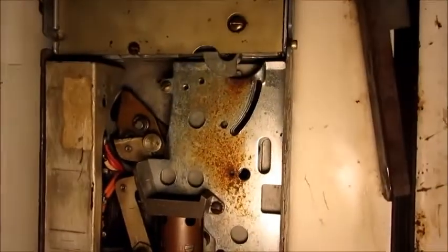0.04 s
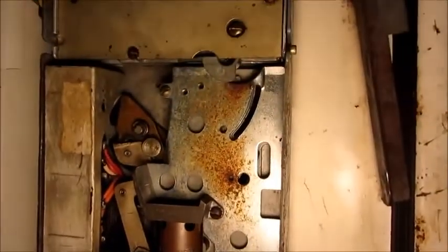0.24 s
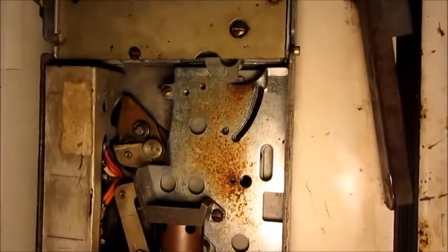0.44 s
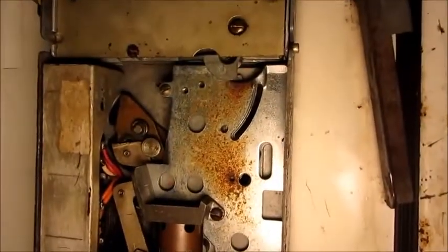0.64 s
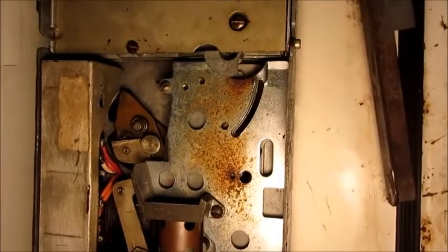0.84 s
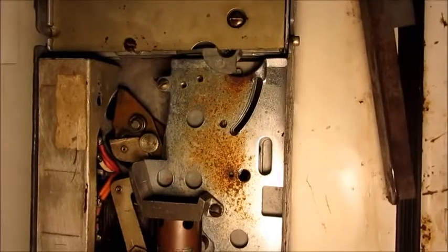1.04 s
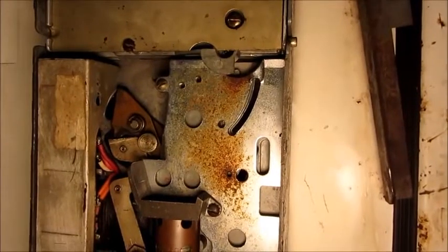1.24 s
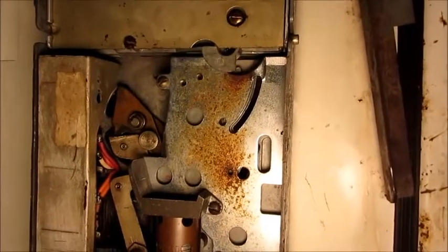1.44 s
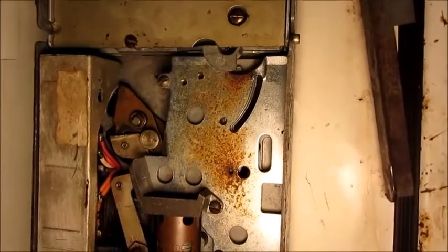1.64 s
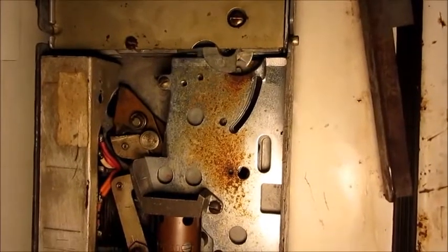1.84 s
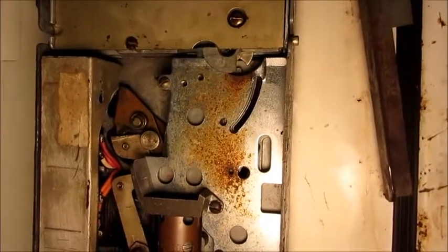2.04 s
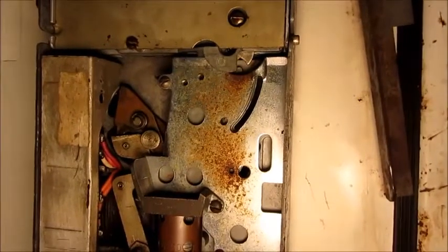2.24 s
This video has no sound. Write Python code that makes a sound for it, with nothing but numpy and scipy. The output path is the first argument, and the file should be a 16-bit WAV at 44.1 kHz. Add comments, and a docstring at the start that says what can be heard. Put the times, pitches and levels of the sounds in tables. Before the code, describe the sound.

A coin drops through a mechanical coin changer, clacking quickly against steel guides and levers, with brief scrapes and a thin, high ring between hits. It is heard up close in a small room with a low hum.

```python
"""A small room hums over low noise and a faint hiss. At 0.9 s, close by, a coin skids into a mechanical
coin changer and falls through it, clacking against steel guides and levers. Every contact rings the
struck part and the frame and knocks the housing. Between contacts the rim scrapes along guides, and in
free flight the coin itself sings very high. The last clack comes just after 2 s; the hum remains."""
import sys
import numpy as np
from scipy import signal
from scipy.fft import rfft, irfft, next_fast_len
from scipy.io import wavfile
from scipy.ndimage import map_coordinates

SR = 44100
rng = np.random.default_rng(int(sys.argv[2]) if len(sys.argv) > 2 else 0)


def wrap_up_sound(samples):
    """Save the sound to the file named by the first command line argument, as 16-bit audio."""
    columns = np.atleast_2d(samples).T
    # keep every value between -1 and 1, then stretch to whole-number steps
    tamed = np.clip(columns, -1, 1)
    steps = np.round(tamed * 32767).astype(np.int16)
    wavfile.write(sys.argv[1], SR, steps)


N = 100239

# Room noise spectrum. Each row: frequency in Hz, relative level in dB.
AIR_SPECTRUM = [(15, -36.5), (26, -7.5), (34, -9.5), (44, -15), (60, -8.5), (95, -6), (115, -3.5),
                (140, -4), (200, -1.5), (300, -9), (420, -12.5), (640, -16), (850, -18.5), (1600, -28.5),
                (3400, -40), (6500, -47), (8100, -46.5), (14400, -63), (16000, -84.5)]
# Room noise envelope. Each row: time in seconds, level in dB before AIR_GAIN_DB.
AIR_ENVELOPE = [(0, -42), (.5, -39.5), (.72, -37.5), (1.0, -39), (1.48, -39.5), (1.6, -43), (2.1, -45),
                (2.27, -45)]
# Hiss spectrum. Each row: frequency in Hz, relative level in dB.
HISS_SPECTRUM = [(300, 2.5), (800, 3.5), (2000, 4.5), (4000, -6), (6500, -23.5), (8000, -7.5), (9000, -25),
                 (14000, -32.5)]
# Hum envelope. Each row: time in seconds, level in dB.
HUM_ENVELOPE = [(0, -40), (.25, -44), (.42, -46), (.66, -34), (.82, -54), (.95, -38), (1.15, -43),
                (1.6, -52), (2.0, -49.5), (2.27, -41.5)]
# Room decay. Each row: frequency in Hz, T60 in seconds.
ROOM_DECAY = [(300, 0.15), (3000, 0.62), (8000, .28), (15000, 0.33)]
# Coin sliding on a guide. Each row: start in seconds, length in seconds, level in dB,
# guide resonance in Hz.
GUIDE_SLIDES = [(0.913, 0.055, -48.5, 5550), (0.983, 0.015, -31, 2900), (1.002, .03, -27, 5500),
                (1.162, 0.089, -45.5, 2600), (1.358, 0.27, -52.5, 2600), (1.555, 0.036, -36.5, 4100),
                (1.591, 0.049, -45, 4050), (1.678, 0.016, -45.5, 3620), (1.77, 0.045, -42, 2520)]
# Scrape spectrum. Each row: frequency in Hz, relative level in dB.
SCRAPE_SPECTRUM = [(500, -2.5), (1500, -3.5), (2600, 8), (4200, 2.5), (7500, -3.5), (10000, -15),
                   (15000, -23.5)]
# Coin ringing in flight. Each row: start in seconds, length in seconds, lower and upper mode level in dB.
FLIGHTS = [(.975, .04, -37, -40), (1.012, 0.05, -41, -38), (1.314, 0.025, -60, -50),
           (1.375, 0.031, -47, -55), (1.522, 0.055, -48, -37.5), (1.551, .04, -48, -30),
           (1.606, 0.071, -46, -35.5), (1.74, 0.13, -45.5, -43), (1.863, 0.03, -28.5, -48),
           (1.935, 0.053, -47, -44), (2.027, 0.072, -43, -40)]
# Clack filter. Each row: frequency in Hz, gain in dB.
CLACK_SPECTRUM = [(150, -39.5), (500, -3), (900, -4), (1500, -6), (2500, -2.5), (4000, -1), (6500, 0),
                  (9000, -1.5), (11000, -7), (13800, -9.5), (15000, -21.5)]
# Steel frame modes. Each row: frequency in Hz, mean level in dB before the clack filter, T60 in seconds.
FRAME_MODES = [(1356, -9.5, 0.046), (1634, -10.5, 0.1), (2375, -13.5, 0.068), (2543, -15, 0.052),
               (2873, -15, 0.049), (3220, -26, 0.054), (3640, -12.5, 0.028), (3890, -21, 0.074),
               (4680, -20.5, 0.05), (5450, -28.5, 0.023), (6830, -10, 0.018), (7880, -16, 0.019),
               (9200, -28, 0.022), (11400, -17, 0.022)]
# Coin contacts. Each row: start in seconds, gain in dB, relative bass and treble in dB, housing knock
# in Hz, main and second note of the struck part in Hz, rattle T60 in seconds.
COIN_CONTACTS = [(0.9409, -35, -1.5, -12, 810, 5600, 2540, 0.026),
                 (0.9703, -10, -22, -21, 1345, 5610, 4150, 0.066),
                 (0.9773, -14, -10.5, -13.5, 1375, 3700, 2810, 0.057),
                 (0.9826, -19, -8, -9, 1375, 2510, 3730, 0.025),
                 (0.9977, -15, -7, -8, 795, 5420, 6440, 0.033),
                 (1.004, -15.5, -10, -1, 1346, 5430, 2850, 0.025),
                 (1.0114, -17.5, -23, 0, 1160, 5490, 2730, 0.033),
                 (1.0143, -11, -18.5, 0.5, 1360, 2790, 5530, 0.021),
                 (1.0217, -23, -5, -10, 1604, 2450, 4500, 0.036),
                 (1.0382, -21.5, -13, -7, 1640, 8800, 2970, 0.048),
                 (1.0619, -13, -4.5, 0.5, 1520, 7200, 5830, 0.024),
                 (1.1519, -23.5, -12.5, 2.5, 1730, 4800, 8400, 0.033),
                 (1.17, -16, -10.5, 3, 1656, 5600, 6910, 0.018),
                 (1.1836, -32.5, 2.5, 0.5, 1360, 2830, 7440, 0.045),
                 (1.1974, -29.5, -1, -16.5, 1350, 5700, 2960, 0.056),
                 (1.2173, -23, -0.5, -6.5, 1322, 2660, 7180, 0.037),
                 (1.3135, -29.5, -2.5, -9.5, 1410, 2480, 3730, 0.058),
                 (1.3454, -33.5, -3, -7, 925, 2820, 4200, 0.044),
                 (1.3722, -28, -9, -13.5, 1640, 4700, 5570, 0.062),
                 (1.4121, -38, 8.5, 8, 1640, 2850, 3670, 0.022),
                 (1.4165, -17, -6.5, -7, 960, 2540, 3820, 0.029),
                 (1.4734, -27, 1, -6, 1636, 2680, 2140, 0.015),
                 (1.521, -6.5, -22.5, -3, 1384, 3980, 2540, 0.021),
                 (1.5645, -20.5, -25, -14, 1330, 4030, 7250, 0.025),
                 (1.57, -22.5, -24.5, -7, 1320, 4200, 7300, 0.085),
                 (1.603, -17, -14, -1.5, 1840, 7100, 3870, 0.024),
                 (1.605, -18.5, -10.5, 0.5, 1340, 7040, 4050, 0.036),
                 (1.6408, -21.5, -14.5, -2.5, 1400, 3880, 5840, 0.054),
                 (1.7298, -18, -20, -0.5, 900, 5780, 2560, 0.037),
                 (1.7355, -8.5, -21, -8.5, 914, 5570, 2660, 0.045),
                 (1.8459, -17, -5, 7, 1500, 7900, 9250, 0.043),
                 (1.8601, -16.5, -10, -6, 1710, 5700, 10650, 0.048),
                 (1.8925, -34, -10.5, -8, 810, 7720, 3710, 0.044),
                 (1.9121, -17.5, -15.5, -1, 900, 7200, 2770, 0.061),
                 (1.9208, -22.5, -9.5, -7.5, 1740, 5430, 4690, 0.023),
                 (1.9333, -9, -12.5, 0, 1616, 3860, 6930, 0.028),
                 (1.9534, -11, -16, 1, 1570, 3210, 7000, 0.024),
                 (2.004, -20, -13.5, -4, 1540, 5600, 2850, 0.035),
                 (2.0275, -14, -16.5, -7.5, 1110, 3570, 2970, 0.051),
                 (2.037, -17.5, -21, -31, 1710, 3170, 3780, 0.12),
                 (2.0488, -23.5, -16, -29, 800, 4330, 4930, 0.026),
                 (2.056, -23.5, -8, -1, 1880, 4270, 2720, 0.024)]

AIR_GAIN_DB, HISS_DB, ROOM_DB = 2.5, -60, -23.5
HUM_HZ, HUM_WAVER_RAD = 66.3, .5
GUIDE_PEAK_DB, GUIDE_HALF_WIDTH_HZ = 6.5, 300
ROUGHNESS_DB, BUMPS_PER_S = 2, 500
COIN_MODES_HZ, COIN_T60_S = (13465, 13835), 0.18
FLUTTER_DB, FLUTTER_RAD, FLUTTER_PER_S = 3, .6, 330
TICK_DB, TICK_T60_S = 2, 0.00084
CRACK_DB, CRACK_T60_S = -9, 0.013
RATTLE_DB, STRIKE_ATTACK_S = -5, .0001
MAIN_DB, MAIN_T60_S = -3, 0.021
SECOND_DB, SECOND_T60_S = -6.5, 0.026
KNOCK_DB, KNOCK_T60_S, KNOCK_ATTACK_S = -4, .038, .001
BASS_SHELF_HZ, TREBLE_SHELF_HZ = 1930, 6560


def amp(db):
    """Decibels to gain."""
    return 10 ** (np.asarray(db) / 20)


def unit_rms(x):
    """Scale to rms 1."""
    return x / np.sqrt(np.mean(x ** 2) + 1e-20)


def log_interp(rows, hz):
    """Interpolate (Hz, value) rows on a log axis."""
    row_hz, values = np.transpose(rows)
    return np.interp(np.log(hz + 1), np.log(row_hz + 1), values)


def curve(rows):
    """(s, value) rows as one value per sample."""
    return np.interp(np.arange(N) / SR, *np.transpose(rows))


def wobble(knots_per_s):
    """Smooth random curve."""
    return map_coordinates(rng.standard_normal(2000), [np.arange(N) * knots_per_s / SR], mode="wrap")


def noise(spectrum):
    """Coloured noise of rms 1."""
    size = next_fast_len(N + 8192)
    gain = amp(log_interp(spectrum, np.fft.rfftfreq(size, 1 / SR)))
    return unit_rms(irfft(rfft(rng.standard_normal(size)) * gain)[:N])


def min_phase(x, gain):
    """Minimum-phase filter, one gain per frequency bin."""
    cepstrum = irfft(np.log(np.maximum(gain, 1e-6)))
    half = len(cepstrum) // 2
    cepstrum[1:half] *= 2
    cepstrum[half + 1:] = 0
    return irfft(rfft(x) * np.exp(rfft(cepstrum)))


def decay(t, t60_s):
    """Exponential decay."""
    return np.exp(-np.log(1000) * t / t60_s)


def partial(t, hz, t60_s, phase_turns=0):
    """Decaying sine of a struck mode."""
    return decay(t, t60_s) * np.sin(2 * np.pi * (hz * t + phase_turns))


def add(out, start_s, x):
    """Mix x into out."""
    i = int(round(start_s * SR))
    out[i:i + len(x)] += x[:len(out) - i]


def background():
    """Low room noise, a wavering hum, a faint hiss."""
    air = amp(curve(AIR_ENVELOPE) + AIR_GAIN_DB) * noise(AIR_SPECTRUM)
    hum_rad = 2 * np.pi * HUM_HZ * np.arange(N) / SR + HUM_WAVER_RAD * wobble(knots_per_s=6.8)
    hum = amp(curve(HUM_ENVELOPE)) * np.sin(hum_rad)
    return air + hum + amp(HISS_DB) * noise(HISS_SPECTRUM)


def room_reverb(x):
    """Short diffuse tail, longest near 3 kHz."""
    hz, t, bins = signal.stft(rng.standard_normal(SR // 2), SR, nperseg=256)
    bins = bins * decay(t, log_interp(ROOM_DECAY, hz)[:, None])
    tail = signal.istft(bins, SR, nperseg=256)[1]
    return signal.fftconvolve(x, tail / np.linalg.norm(tail))[:N]


def rim_scrapes():
    """The rim scrapes unevenly along a guide, which resonates."""
    out, size = np.zeros(N), 8192
    hz = np.fft.rfftfreq(size, 1 / SR)
    for start_s, length_s, level_db, guide_hz in GUIDE_SLIDES:
        friction = rng.standard_normal(size) * amp(ROUGHNESS_DB * wobble(BUMPS_PER_S)[:size])
        guide_db = GUIDE_PEAK_DB / (1 + ((hz - guide_hz) / GUIDE_HALF_WIDTH_HZ) ** 2)
        scrape = unit_rms(min_phase(friction, amp(log_interp(SCRAPE_SPECTRUM, hz) + guide_db)))
        stroke = signal.windows.tukey(min(int(length_s * SR), size), .5)  # capped at 186 ms
        add(out, start_s, amp(level_db) * stroke * scrape[:len(stroke)])
    return out


def coin_ringing():
    """Two close coin modes sing until the next guide damps them, fluttering as the coin tumbles."""
    out = np.zeros(N, complex)
    for start_s, length_s, *levels_db in FLIGHTS:
        t = np.arange(int(length_s * SR)) / SR
        pair = sum(amp(db) * np.exp(2j * np.pi * hz * t) for hz, db in zip(COIN_MODES_HZ, levels_db))
        add(out, start_s, pair * decay(t, COIN_T60_S) * signal.windows.tukey(len(t), alpha=0.68))
    flutter = amp(FLUTTER_DB * wobble(FLUTTER_PER_S))
    smear = np.exp(1j * FLUTTER_RAD * wobble(FLUTTER_PER_S))
    return (out * flutter * smear).imag


def frame_ring(t, spread_db=3.8):
    """The steel frame's modes, random in level and phase at each hit."""
    return sum(amp(db + spread_db * rng.standard_normal()) * partial(t, hz, t60_s, rng.random())
               for hz, db, t60_s in FRAME_MODES)


def clack_filter(hz, bass_db, treble_db, ripple_db=2.3, spacing_hz=300):
    """Shelved clack spectrum with random ripple: each spot hit favours some resonances, misses others."""
    ripple = map_coordinates(rng.standard_normal(100), [hz / spacing_hz], mode="nearest")
    bass_shelf = 1 / (1 + (hz / BASS_SHELF_HZ) ** 6)
    treble_shelf = 1 - 1 / (1 + (hz / TREBLE_SHELF_HZ) ** 6)
    shelves_db = bass_shelf * (bass_db + 5) + treble_shelf * (treble_db - 0.5)
    return unit_rms(amp(ripple_db * ripple)) * amp(log_interp(CLACK_SPECTRUM, hz) + shelves_db)


def coin_clacks():
    """Coin on steel: tick, crack, thin-steel rattle, frame ring, struck part's notes, housing knock."""
    out, t = np.zeros(N), np.arange(8192) / SR
    hz = np.fft.rfftfreq(len(t), 1 / SR)
    snap = amp(TICK_DB) * decay(t, TICK_T60_S) + amp(CRACK_DB) * decay(t, CRACK_T60_S)
    strike_rise = 1 - np.exp(-t / STRIKE_ATTACK_S)
    knock_rise = 1 - np.exp(-t / KNOCK_ATTACK_S)
    for start_s, gain_db, bass_db, treble_db, knock_hz, main_hz, second_hz, t60_s in COIN_CONTACTS:
        burst = rng.standard_normal(len(t)) * (snap + amp(RATTLE_DB) * decay(t, t60_s))
        strike = (2 * burst + frame_ring(t)) * strike_rise
        clack = min_phase(strike, clack_filter(hz, bass_db, treble_db))
        part = amp(MAIN_DB) * partial(t, main_hz, MAIN_T60_S)
        part += amp(SECOND_DB) * partial(t, second_hz, SECOND_T60_S)
        knock = amp(KNOCK_DB + bass_db) * partial(t, knock_hz, KNOCK_T60_S) * knock_rise
        add(out, start_s, amp(gain_db) * (clack + part + knock))
    return out


def scene():
    """The coin's fall in the room, mono."""
    coin = coin_clacks() + coin_ringing() + rim_scrapes()
    return (coin + amp(ROOM_DB) * room_reverb(coin) + background())[None]


def record(dry):
    """Clip at full scale, then low-pass steeply."""
    size, cutoff_hz = next_fast_len(N + 8192), 15100
    hz = np.fft.rfftfreq(size, 1 / SR)
    lowpass = 1 / np.sqrt(1 + (hz / cutoff_hz) ** 80)
    return irfft(rfft(np.clip(dry, -1, 1), size) * lowpass, size)[..., :N]


dry = scene()
out = record(dry)
wrap_up_sound(out)
```